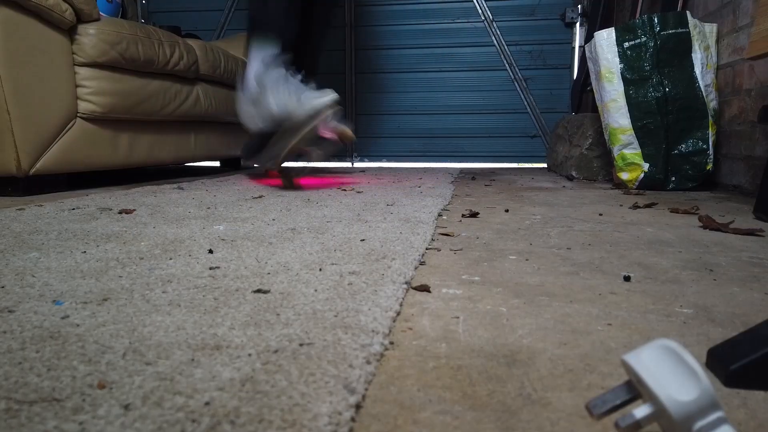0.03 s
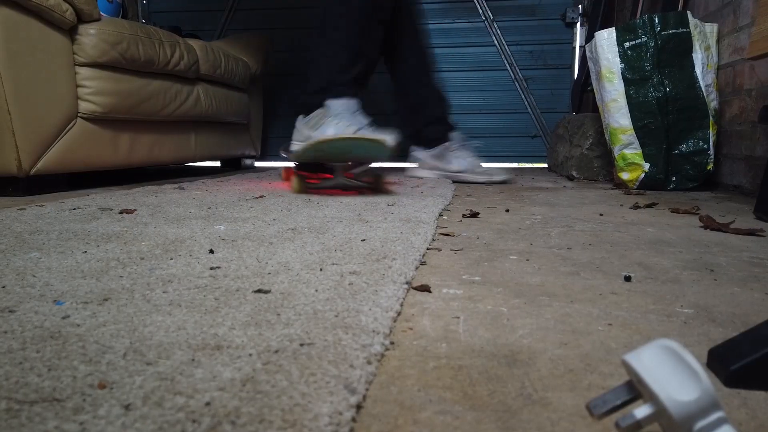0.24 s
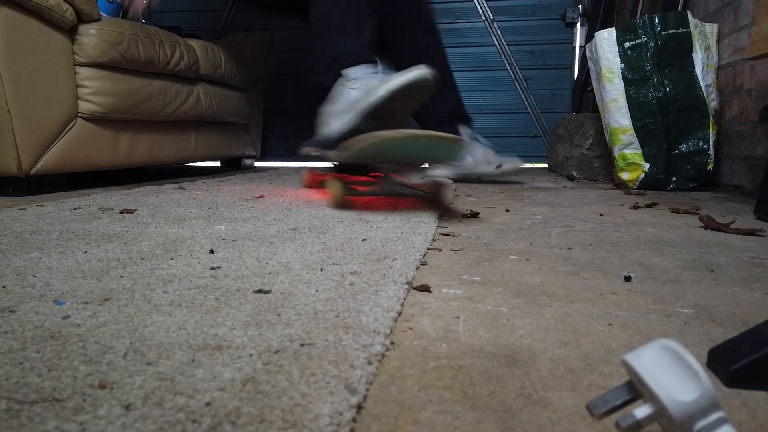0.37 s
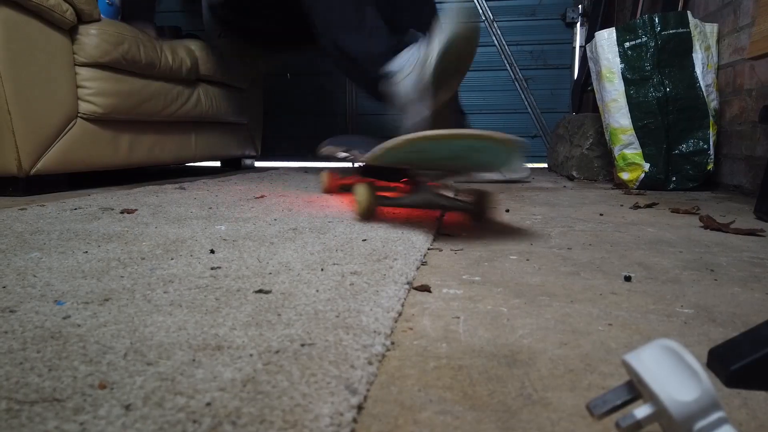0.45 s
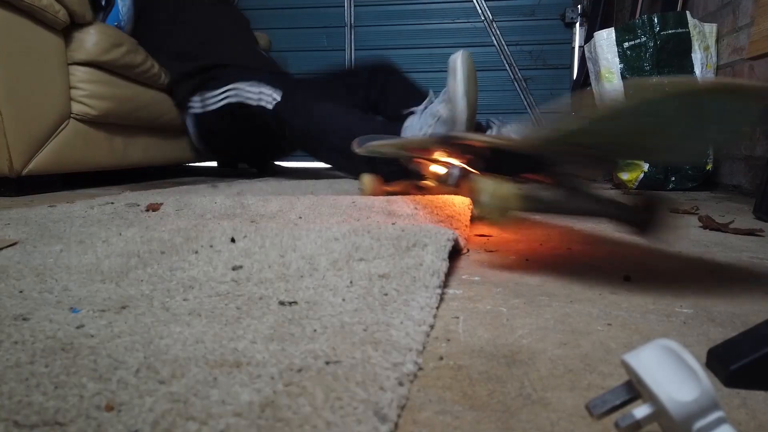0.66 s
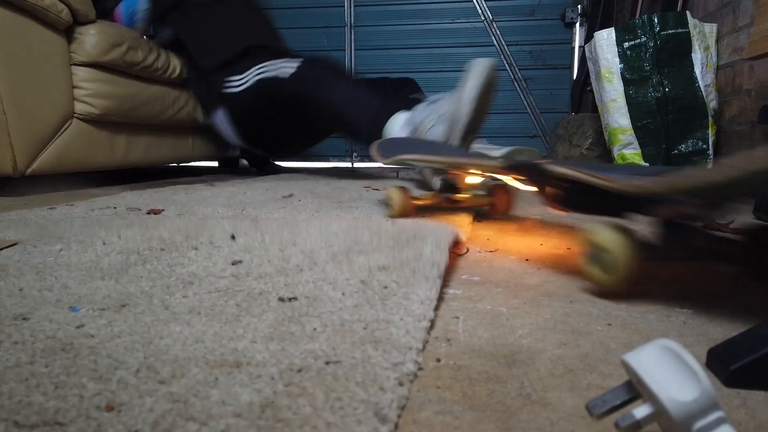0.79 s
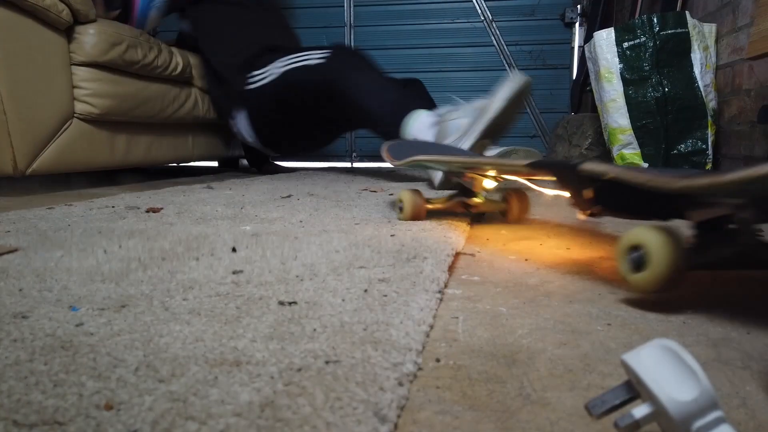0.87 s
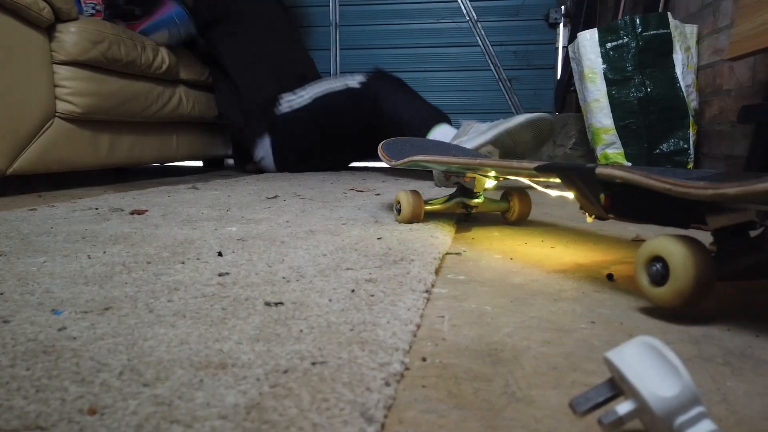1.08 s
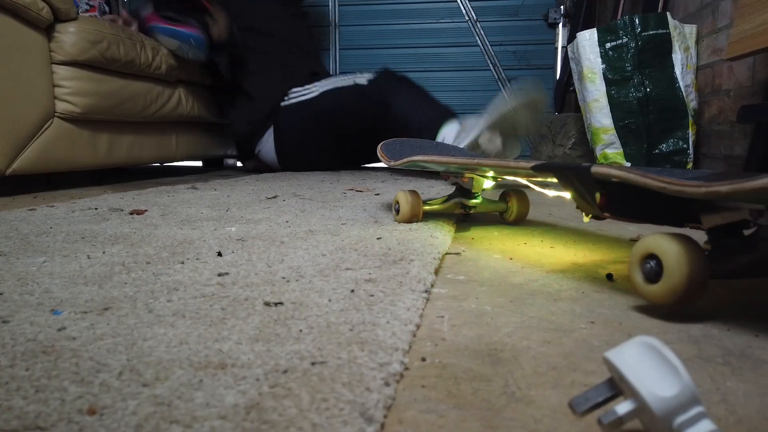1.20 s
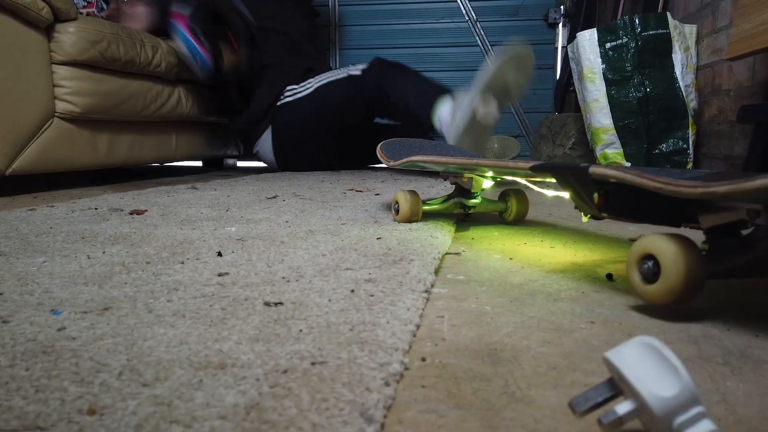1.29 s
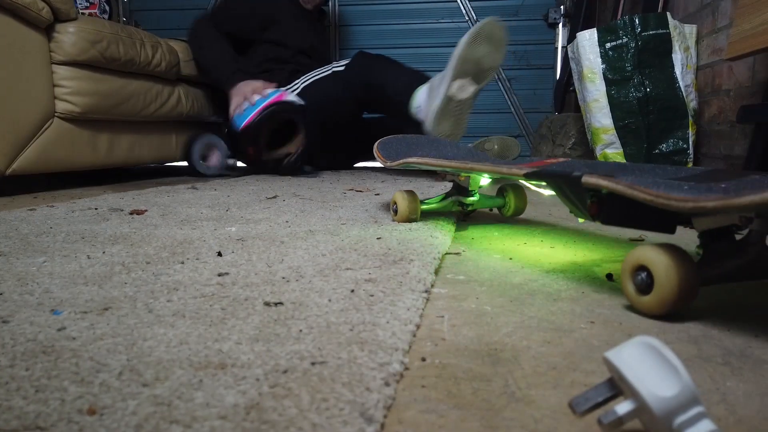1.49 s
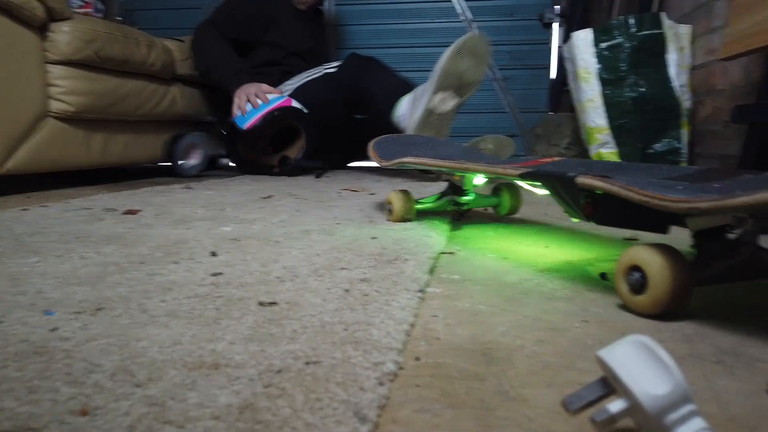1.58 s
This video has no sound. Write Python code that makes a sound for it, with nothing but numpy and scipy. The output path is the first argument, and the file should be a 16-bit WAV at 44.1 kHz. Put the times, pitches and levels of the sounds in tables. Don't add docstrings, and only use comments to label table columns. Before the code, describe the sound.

Skateboard in a small echoing garage: sharp double deck knock with wheel cracks, faint gritty rolling and light knocks, then a bright, very close metal clatter and hollow shake settling into quiet on a small stereo microphone.

```python
import sys
import numpy as np
from scipy import signal
from scipy.io import wavfile
from scipy.ndimage import uniform_filter1d

SR = 44100
rng = np.random.default_rng(int(sys.argv[2]) if len(sys.argv) > 2 else 0)


def log_audio(samples):
    frames = np.atleast_2d(samples).T
    limited = np.clip(frames, -1, 1)
    pcm = np.round(limited * 32767).astype(np.int16)
    wavfile.write(sys.argv[1], SR, pcm)


def invert_db(x):
    u = np.asarray(x, float) / 20
    return 10 ** u


N = 72765
T = np.arange(N) / SR

# start in seconds, peak in dB, crack in dB re peak, struck spot's pitch in Hz.
DECK_KNOCKS = [(.202, -28.5, -18, 520), (.207, -23.5, -34, 503), (.216, -31, -15.5, 610),
               (.2262, -9.5, -17.5, 650), (.231, -28, -14.5, 1280), (.238, -14.5, -29.5, 740),
               (.2435, -13, -27.5, 637), (.253, -27.5, -23.5, 643), (.259, -24.5, -17, 614),
               (.27, -25, -21.5, 650), (.278, -35.5, -14, 560), (.318, -16.5, -22, 585),
               (.322, -15.5, -24, 636), (.326, -12.5, -34, 556), (.3315, -8, -32, 520),
               (.342, -14, -40, 700), (.347, -9, -36, 530), (.352, -13, -32, 754), (.364, -20, -30, 870),
               (.371, -19.5, -36.5, 574), (.384, -22, -37, 680), (.392, -24, -37.5, 635),
               (.41, -34, -32.5, 564), (.431, -36.5, -31, 486), (.627, -26.5, -39.5, 700),
               (.637, -30, -17.5, 700), (.646, -24, -42.5, 594), (.655, -28, -43, 600),
               (.665, -35, -31, 660), (.785, -37.5, -20.5, 620), (.801, -26.5, -24, 706),
               (.868, -23, -38, 400), (.931, -23, -21, 770), (.938, -24.5, -33.5, 694),
               (0.9493, -20, -37, 596), (.957, -22.5, -31.5, 870), (.962, -23, -34, 654),
               (.979, -25.5, -36.5, 605), (.986, -30.5, -31, 622), (1.008, -37, -14, 710)]
# start in seconds, peak in dB, fizz in dB re peak, struck spot's pitch in Hz.
CLATTER_HITS = [(0.9307, -20.5, -23, 1660), (0.935, -27, -17, 2300), (0.938, -26.5, -19.5, 1410),
                (1.0297, -37, -20.5, 1200), (1.034, -20, -22, 943), (1.0386, -17, -29, 1800),
                (1.043, -15.5, -11.5, 2720), (1.0475, -21.5, -19.5, 2200), (1.054, -25.5, -20, 3800),
                (1.059, -30.5, -10, 1970), (1.065, -22, -10.5, 3400), (1.066, -29, -20.5, 1510),
                (1.0713, -12, -14, 1600), (1.0749, -18, -19, 2780), (1.08, -17.5, -15, 3450),
                (1.083, -13.5, -24, 2000), (1.085, -21, -20.5, 1500), (1.09, -25, -22, 3200),
                (1.093, -26, -21.5, 1460), (1.102, -31, -26, 1600), (1.1042, -19, -22, 2000),
                (1.11, -27, -11.5, 1500), (1.1142, -20.5, -15, 1450), (1.1191, -14, -32.5, 2600),
                (1.122, -19, -27.5, 1400), (1.128, -27.5, -28.5, 1400), (1.137, -24.5, -22, 1210),
                (1.139, -26, -17, 2000), (1.141, -29.5, -20, 2500), (1.146, -31, -23, 1500),
                (1.155, -23, -34, 1500), (1.1696, -25.5, -10.5, 1790), (1.172, -32.5, -24, 2520),
                (1.271, -31.5, -10.5, 2040), (1.484, -42.5, -19.5, 2500)]
# start in seconds, peak in dB, pitch in Hz, T60 in seconds.
FLOOR_THUMPS = [(0.205, -42, 91.5, 0.17), (0.231, -30.5, 101, 0.19), (0.226, -35, 237.9, 0.58),
                (0.332, -31, 217, 0.13), (0.335, -44, 63.4, 0.064), (0.627, -50, 61, 0.51),
                (0.784, -34.5, 57.2, 0.51), (.838, -35, 58.8, 0.92), (0.882, -19, 92, 0.055),
                (0.911, -26.5, 55, 0.069), (0.963, -34, 29.6, 0.6), (1.028, -26.5, 498, 0.088),
                (1.047, -21.5, 488, 0.082), (1.053, -18.5, 500, 0.023), (1.184, -31, 337, 0.084),
                (1.21, -30.5, 480, 0.29), (.225, -10, 624, 0.11), (.336, -18.5, 620, 0.051),
                (0.361, -33, 150, 0.25), (0.851, -34.5, 154, .06), (1.25, -38.5, 60, 0.11),
                (.93, -33, 204, .05), (1.051, -31, 58, 0.43), (1.1, -44.5, 50.6, 0.26),
                (1.104, -33, 109.5, 0.078), (1.127, -26.5, 209, 0.12), (1.26, -43, 52.4, 0.14),
                (1.299, -47, 119.2, 0.7), (1.47, -48.5, 115.9, 0.94)]
# frequency in Hz, level in dB, T60 in seconds.
DECK_MODES = [(162.5, -11.5, 0.12), (229.3, -5.5, 0.051), (346.3, -5.5, 0.077), (435, -11, 0.049),
              (500, -8.5, 0.046), (543, -1.5, 0.032), (601.6, -4.5, 0.039), (654.6, -5, 0.066),
              (721, -15, 0.043), (767, -5.5, 0.022), (860, -3, 0.03), (1050, -7.5, 0.026),
              (1196, -12, 0.051), (1292, -5.5, 0.014)]
# frequency in Hz, level in dB, T60 in seconds.
TRUCK_MODES = [(900, 2, 0.012), (1060, -7, 0.043), (1397, -12, 0.041), (1550, 0, 0.017), (1696, -6, 0.023),
               (2033, -5, 0.0095), (2704, 5.5, 0.0061), (3050, -11.5, 0.0325), (3460, 3.5, 0.0078),
               (3880, -13, 0.04), (4500, -15.5, 0.028)]
# frequency in Hz, level in dB, T60 in seconds.
HOLLOW_MODES = [(164, -12, 0.13), (242, -14.5, 0.15), (355.2, -12.5, 0.25), (451, 0, 0.032),
                (488, -12, 0.073), (560, -1, 0.018), (768, -8.5, 0.031), (910, -19, 0.066)]
# time in seconds, level in dB.
ROLL_CURVE = [(.4, -54), (.55, -60), (.62, -63), (.7, -63), (.74, -49.5), (.8, -44), (.84, -50), (.89, -60),
              (.925, -62.5)]
# time in seconds, level in dB.
SCRAPE_CURVE = [(1.03, -33.5), (1.06, -35.5), (1.08, -31.5), (1.098, -38), (1.125, -32), (1.16, -52.5),
                (1.21, -60.5), (1.3, -53), (1.62, -79.5)]
# time in seconds, level in dB.
SETTLE_CURVE = [(1.032, -35), (1.055, -39), (1.075, -39), (1.13, -37), (1.19, -44), (1.29, -43.5),
                (1.33, -51.5), (1.45, -56.5), (1.64, -69)]
# frequency in Hz, density in dB per Hz.
CRACK_SPECTRUM = [(880, -0.5), (1500, -5), (3350, -12.5), (5830, -23), (11300, -20), (16000, -31.5)]
# frequency in Hz, density in dB per Hz.
FIZZ_SPECTRUM = [(470, -5.5), (800, 2), (1500, 5.5), (3380, -3.5), (5180, -15), (11800, -16),
                 (16000, -30.5)]
# frequency in Hz, density in dB per Hz.
WHEEL_SPECTRUM = [(120, -27.5), (220, -11), (322, -3), (696, 0), (1500, -3.5), (3500, -9), (6000, -19.5),
                  (11000, -19), (16000, -40.5)]
# frequency in Hz, density in dB per Hz.
EARLIER_SPECTRUM = [(40, -10), (150, -10), (330, -2.5), (637, 5), (1100, -7), (1500, -1), (16000, -24.5)]
# frequency in Hz, density in dB per Hz.
HUSH_SPECTRUM = [(20, 7), (70, -10), (130, -20), (300, -28), (620, -23.5), (1500, -31.5), (9000, -34),
                 (16000, -30.5)]
# frequency in Hz, T60 in seconds.
ROOM_T60 = [(60, 0.76), (250, 0.31), (700, 0.34), (2000, 0.5), (6000, 0.38), (15000, 0.35)]
# frequency in Hz, correlation from -1 to 1.
LIKENESS = [(100, .9997), (600, 1), (1300, 0.91), (3000, 0.69), (6000, 0.54), (15000, -0.0095)]

DECK_DB, DECK_SPREAD_DB, DECK_CONTACT_S = -0.5, 1.5, 0.0048
CRACK_DB, CRACK_T60_S, CRACK_DELAY_S = 2.5, 0.14, 0.00069
TRUCK_DB, TRUCK_SPREAD_DB, TRUCK_CONTACT_S = -5.5, 2.5, 0.002
FIZZ_DB, FIZZ_T60_S, TICK_HZ = -5, 0.03, 6800
SCRAPE_DB, RATTLE_DB, HOLLOW_DB = -4, -13.5, -5.5
FOCUS_DB_PER_OCT2, FOCUS_LIMIT_DB, LONGEST_KNOCK_S = 54.5, 9.5, 0.06
ROLL_DB, GRIT_DB, GRITS_PER_S = 3, -6, 1500
LEAN_DB = 0.12
ROOM_DB, NEAR_ROOM_DB, ROOM_ONSET_S = -7, -8, 0.0091
EARLIER_DB, EARLIER_T60_S = -57.5, 0.31
HUSH_DB, HUSH_PATCHY_DB, HUSH_FALL_DB, HUSH_FALL_S = -70, 2, 11, 1.55
RUSTLE_DB, RUSTLE_S, RUSTLE_LENGTH_S, RUSTLE_HZ = -65, 1.565, 0.026, 8130
BUZZ_HZ, BUZZ_DB, BUZZ_END_S = 15650, -79.5, 0.85
LOW_CUT_HZ, TOP_HZ = 36, 16000
RUN_IN = 4000


def deck():
    s, db, crack_db, spot_hz = np.transpose(DECK_KNOCKS)
    knocks = struck(DECK_MODES, s, db + DECK_DB, spot_hz, DECK_SPREAD_DB, DECK_CONTACT_S)
    crack = bursts(s + CRACK_DELAY_S, db + crack_db + CRACK_DB, CRACK_T60_S)
    return knocks + uniform_filter1d(crack, size=120) * bands(CRACK_SPECTRUM)


def clatter():
    s, db, fizz_db, spot_hz = np.transpose(CLATTER_HITS)
    scrape = in_time(SCRAPE_CURVE)
    hits = struck(TRUCK_MODES, s, db + TRUCK_DB, spot_hz, TRUCK_SPREAD_DB, TRUCK_CONTACT_S)
    hollow = invert_db(HOLLOW_DB) * shaken(HOLLOW_MODES, grit(in_time(SETTLE_CURVE)))
    rattle = invert_db(RATTLE_DB) * shaken(TRUCK_MODES, grit(scrape))

    noise = bands(FIZZ_SPECTRUM, patchy_db=3.5)
    bright = high_pass(noise, TICK_HZ)
    tick_gain = uniform_filter1d(bursts(s, db + fizz_db + FIZZ_DB, FIZZ_T60_S), size=60)
    ticks = tick_gain * (bright / bright.std() + 2.51 * noise)
    ragged_scrape = scrape * invert_db(SCRAPE_DB + drift(200)) * noise
    return hits + hollow + rattle + ticks + ragged_scrape


def rolling():
    contact = in_time(ROLL_CURVE)
    shaken_deck = invert_db(GRIT_DB) * shaken(DECK_MODES, grit(contact))
    hiss = invert_db(ROLL_DB) * contact * bands(WHEEL_SPECTRUM, patchy_db=1.5)
    first_whine = whine(hz=9040, s=0.185, length_s=0.02, db=-77)
    second_whine = whine(hz=9450, s=0.655, length_s=0.055, db=-69)
    return shaken_deck + hiss + second_whine + first_whine


def whine(hz, s, length_s, db):
    tone = np.sin(2 * np.pi * hz * T + 1.5 * drift(80))
    return invert_db(db) * tone * np.exp(-((T - s) / length_s) ** 2)


def thumps():
    lean_db = LEAN_DB * rng.choice([-1, 1], len(FLOOR_THUMPS))
    out = 0
    for (s, db, hz, t60_s), side_db in zip(FLOOR_THUMPS, lean_db):
        out = out + ring(clicks([s], [db]), hz, t60_s) * invert_db([[side_db], [-side_db]])
    return signal.lfilter([.05], [1, -.95], out)


def struck(modes, s, db, spot_hz, spread_db, contact_s):
    chance = rng.standard_normal((len(s), len(modes)))
    late = rng.random((len(s), len(modes)))
    length = int(SR * contact_s) + 3
    out = 0
    for k, (hz, level_db, t60_s) in enumerate(modes):
        push = np.hanning(length) * np.sin(2 * np.pi * hz * T[:length])
        push = push / np.abs(push).sum()
        off_db = np.minimum(FOCUS_DB_PER_OCT2 * np.log2(hz / spot_hz) ** 2, FOCUS_LIMIT_DB)
        hit_s = s + contact_s * (late[:, k] / 4 - .5)
        hits = clicks(hit_s, db + level_db - off_db + spread_db * chance[:, k])
        out = out + ring(signal.fftconvolve(hits, push)[:N], hz, min(t60_s, LONGEST_KNOCK_S))
    return out


def shaken(modes, contacts):
    return sum(invert_db(db) * ring(contacts, hz, t60_s) for hz, db, t60_s in modes)


def ring(x, hz, t60_s):
    r, w = invert_db(-60 / (t60_s * SR)), 2 * np.pi * hz / SR
    return signal.lfilter([0, np.sin(w)], [1, -2 * r * np.cos(w), r * r], x + 1e-18)


def grit(level):
    return (rng.random(N) < GRITS_PER_S / SR) * rng.standard_normal(N) * level


def bursts(s, db, t60_s):
    return signal.lfilter([1], [1, -invert_db(-60 / (t60_s * SR))], clicks(s, db))


def clicks(s, db):
    out = np.zeros(N)
    np.add.at(out, (np.asarray(s) * SR).astype(int), invert_db(db))
    return out


def bands(spectrum, patchy_db=0, dying=False):
    edges_hz = 25 * 2 ** np.arange(0, 9.6, .5)
    white = rng.standard_normal((2, 2, N + RUN_IN))
    out = 0
    for k, (low, high) in enumerate(zip(edges_hz, edges_hz[1:])):
        band = signal.butter(2, [low, high], "band", fs=SR, output="sos")
        mid, side = signal.sosfilt(band, white[k % 2])[:, RUN_IN:]
        hz = np.sqrt(low * high)
        alike = np.clip(at_hz(LIKENESS, hz), -1, 1)
        db = at_hz(spectrum, hz) + patchy_db * drift(29.73) - dying * 60 * T / at_hz(ROOM_T60, hz)
        out = out + invert_db(db) * (np.sqrt(1 + alike) * mid + np.sqrt(1 - alike) * side * [[1], [-1]])
    return out / np.sqrt(np.sum(out ** 2) / 2 if dying else np.mean(out ** 2))


def high_pass(x, hz):
    return signal.sosfilt(signal.butter(2, hz, "high", fs=SR, output="sos"), x)


def at_hz(points, hz):
    table_hz, values = np.transpose(points)
    return np.interp(np.log(hz), np.log(table_hz), values)


def in_time(rows):
    s, db = np.transpose(rows)
    return invert_db(np.interp(T, np.r_[s[0] - .008, s, s[-1] + .03], np.r_[-120, db, -120]))


def drift(rate_hz):
    return np.interp(T * rate_hz, np.arange(600), rng.standard_normal(600))


def garage(far, near):
    tail = bands([(25, 0.0099), (20000, 0.003)], dying=True)
    echo = tail * (1 - np.exp(-(T / ROOM_ONSET_S) ** 2))
    sent = (invert_db(ROOM_DB) * far + invert_db(NEAR_ROOM_DB) * near).mean(axis=0, keepdims=True)
    return signal.fftconvolve(echo, sent, axes=1)[:, :N]


def background():
    earlier = invert_db(EARLIER_DB - 60 * T / EARLIER_T60_S) * bands(EARLIER_SPECTRUM)
    fall_db = HUSH_FALL_DB * np.clip((T - HUSH_FALL_S) / 0.05, 0, 1)
    hush = invert_db(HUSH_DB - fall_db) * bands(HUSH_SPECTRUM, patchy_db=HUSH_PATCHY_DB)
    cloth = high_pass(rng.standard_normal((2, N)), RUSTLE_HZ)
    rustle = invert_db(RUSTLE_DB) * cloth * np.exp(-((T - RUSTLE_S) / RUSTLE_LENGTH_S) ** 2)
    return earlier + hush + rustle


def scene():
    far = deck() + rolling()
    near = clatter() + thumps()
    return far + near + garage(far, near) + background()


def low_pass(x):
    return signal.sosfilt(signal.butter(12, 16800, fs=SR, output="sos"), x)


def record(dry):
    buzz_db = BUZZ_DB - 5 + 5.1 * drift(14) - 40 * (T > BUZZ_END_S)
    buzz = invert_db(buzz_db) * np.sin(2 * np.pi * BUZZ_HZ * T + 1.5 * drift(110))
    treble_limit = signal.cheby2(10, 30, TOP_HZ + 200, fs=SR, output="sos")
    mix = signal.sosfilt(treble_limit, high_pass(dry + buzz, LOW_CUT_HZ))
    return low_pass(mix)


dry = scene()
out = record(dry)
log_audio(out)
```